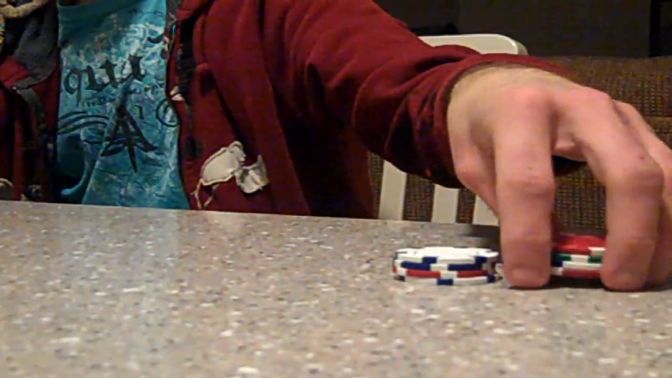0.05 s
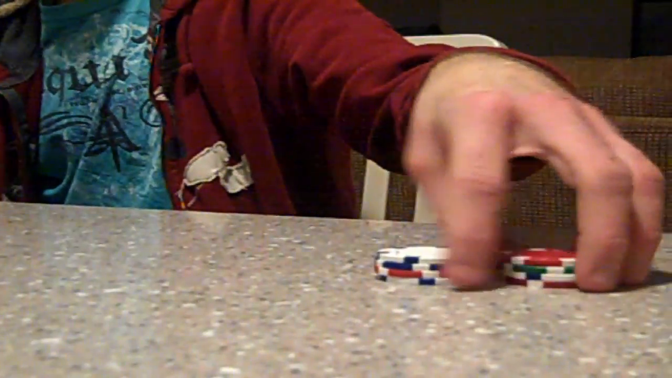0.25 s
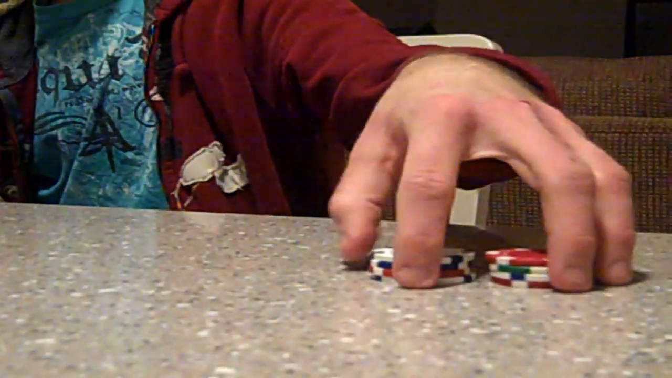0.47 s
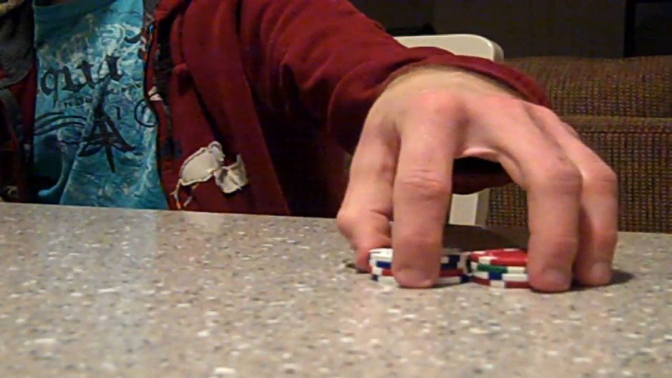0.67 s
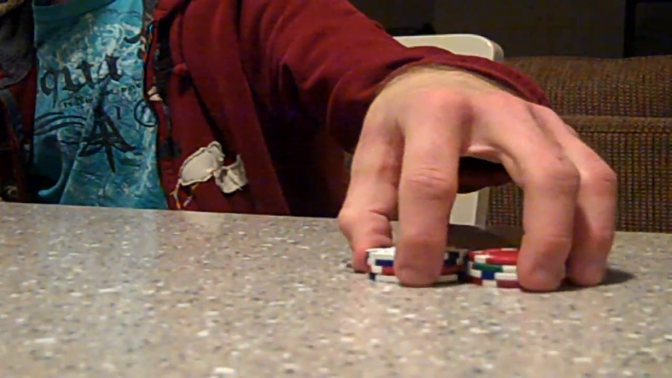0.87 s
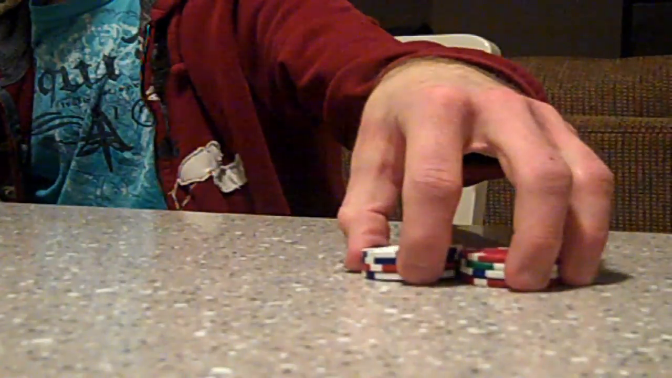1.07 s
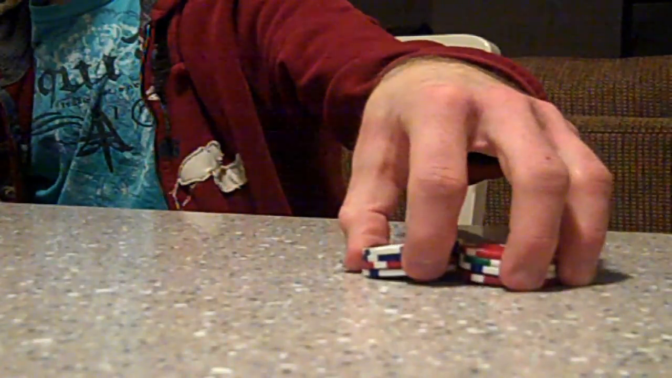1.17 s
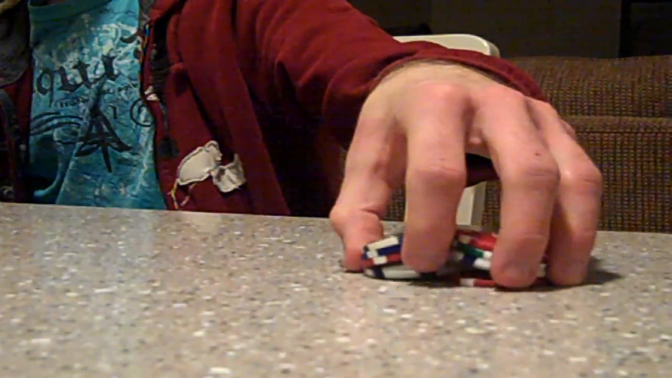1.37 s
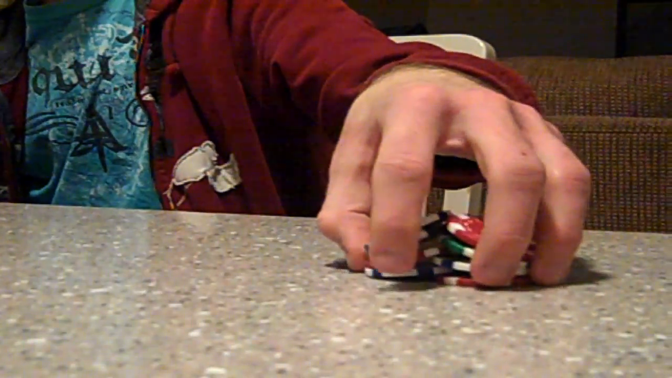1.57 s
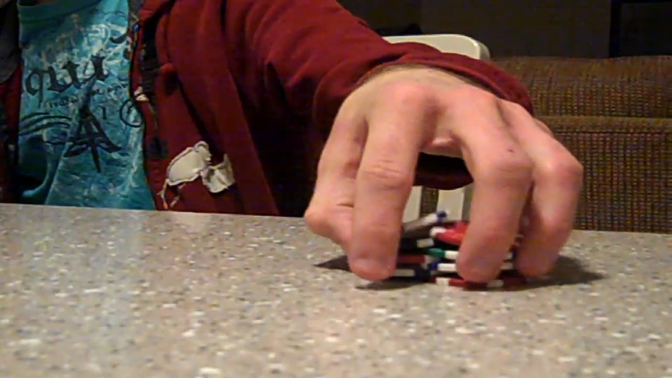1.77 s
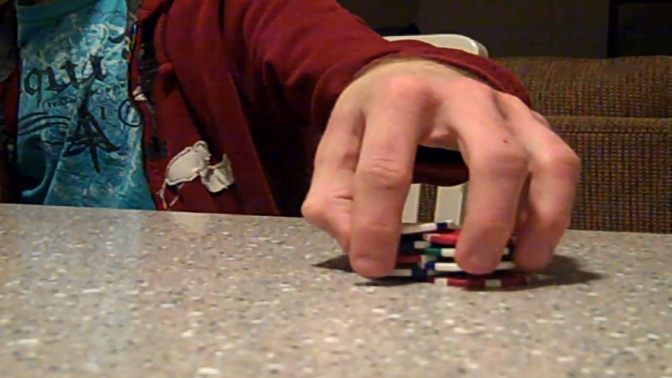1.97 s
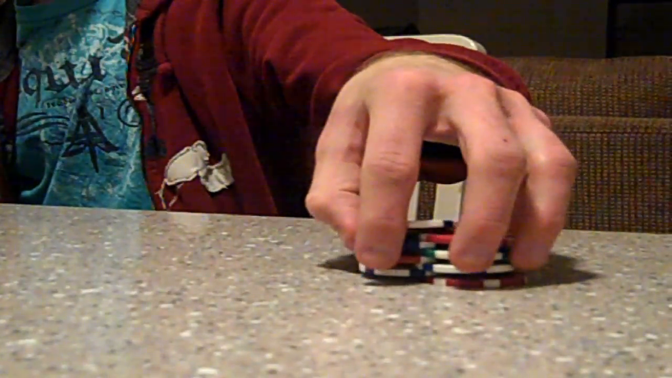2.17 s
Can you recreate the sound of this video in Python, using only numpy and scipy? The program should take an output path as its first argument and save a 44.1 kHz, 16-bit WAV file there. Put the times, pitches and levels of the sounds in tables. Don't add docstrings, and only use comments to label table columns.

```python
import sys
import numpy as np
from scipy import signal
from scipy.fft import rfft, irfft
from scipy.io import wavfile
from scipy.ndimage import uniform_filter1d

SR = 44100
rng = np.random.default_rng(int(sys.argv[2]) if len(sys.argv) > 2 else 0)


def transcribe(signal):
    frames = np.atleast_2d(signal).T
    limited = np.clip(frames, -1, 1)
    pcm = np.round(limited * 32767).astype(np.int16)
    wavfile.write(sys.argv[1], SR, pcm)


def natural_amplitude(level_db):
    exponent = np.asarray(level_db, float) / 20
    return 10 ** exponent


N = 97020

# frequency in [Hz], density in [dB per Hz].
FLOOR_SPECTRUM = [(25,4), (60,-5), (130,0), (300,-9), (700,-12), (1500,-17), (5000,-23.5), (14000,-29.5)]

# start in [s], bending level in [dB], centre of the
# bending modes in [Hz], edge level in [dB], centre of the edge modes in [Hz].
DROP_HITS = [(.1505,-60.5,2000,-31.5,9000), (.2105,-39.5,2200,-34,7240), (.2132,5,2000,10.5,11500),
             (.2148,-0.5,2900,10.5,6880), (.2165,-10,1900,11,7130), (.2195,-12.5,1900,-3,7240),
             (.2235,1,3425,-5.5,4400), (.2248,2,2400,5,6640), (.2280,-10.5,1900,-6,6200),
             (.2298,-7.5,2000,-5.5,6560), (.2325,-8,2600,5.5,6700), (.2345,-17.5,1900,-3,7700),
             (.2380,-9.5,3000,4.5,6800), (.2405,-17,1900,-2,7400), (.2430,-19.5,1900,-15,7750),
             (.2500,-21.5,1900,-24.5,7500)]
# [s, dB, Hz, dB, Hz].
MESH_HITS = [(1.4331,2,2450,-3.5,5860), (1.4372,-13.5,2490,-19.5,5000), (1.449,-47,2010,-24,7880),
             (1.461,-45,2040,-21.5,4966), (1.4690,-35,2000,-23.5,8060), (1.4963,1.5,1640,1.5,5280),
             (1.4969,1,2450,5,7960), (1.499,-11.5,2520,1.5,5600), (1.5028,-12.5,2200,-13.5,7800),
             (1.5222,-28,2010,-20,5420), (1.527,-1.5,2910,1,5640), (1.5319,-34,2005,-9,7700),
             (1.5335,-13.5,2100,-9,5640), (1.5400,-21,2200,-13,5640), (1.6383,-28.5,1950,-50,5500),
             (1.684,-33,1980,-48,5450)]
# [s, dB, Hz, dB, Hz].
SETTLE_HITS = [(1.808,-26,1990,-45,5300), (1.8160,-16,2000,-27,7200), (1.8225,-29,2370,-27,5220),
               (1.837,-27,1390,-28,5245), (1.8463,-13.5,2860,-19,5800), (1.8471,-9,1686,-22.5,4970),
               (1.8646,-13,1880,-23.5,5400), (1.877,-41,2780,-23.5,4630), (1.9158,-13,2050,-20,5730),
               (1.9230,-19.5,2390,-46,7300), (2.0816,-39.5,1890,-59.5,5500), (2.1070,-40,2000,-62,5460),
               (2.1209,-18,2670,-26,5300), (2.1280,-20,2180,-32.5,5300), (2.188,-31.5,1600,-62,5460)]
# [s, dB, Hz, dB, Hz].
EXTRA_HITS = [(.2200,-7,3640,-14,3960), (.2310,-26,3700,-7,4120), (.2420,-16,3570,-14,4495),
              (.7110,-45.5,2000,-63,5540), (.9580,-55,2400,-54,5900), (.9680,-44,2022,-52,7780),
              (.9740,-41,2390,-51,5900), (1.8115,-20.5,2040,-37,5560), (1.8135,-25,2005,-28,4820),
              (1.8185,-19.5,2020,-24,5300), (1.8275,-39,2730,-32,5350), (1.8300,-30,1640,-38,7400),
              (1.8335,-25,1500,-38,7360), (1.8420,-19,1940,-30,5180), (1.8520,-31,1987,-35,5000),
              (1.8670,-45,2400,-31,4730), (1.8720,-34,1900,-26,4750), (1.8810,-29.5,2000,-22,4600),
              (1.8870,-34,2010,-37,4700), (1.9200,-19.5,1720,-38,7260), (1.9260,-37,1900,-39,5150),
              (2.1170,-42,1640,-55,5300), (2.1235,-23.5,1860,-30.5,5640), (2.1330,-28,1900,-48.5,5400),
              (2.1380,-39,1900,-44.5,5300), (2.1440,-42,1850,-56,5000), (2.1950,-35,1380,-52,5300)]

# frequency in [Hz], level in [dB], t60 in [s].
BENDING_MODES = [(1334,-1,0.014), (1640,-4.5,.012), (1821,0,0.017), (2027,-1,.018), (2450,-1.5,0.011),
                 (2790,-2,0.015), (3040,-2,0.014), (3360,-3,.008)]
# frequency in [Hz], level in [dB], t60 in [s].
EDGE_MODES = [(4040, -1.5, 0.0043), (4400, -7.5, 0.0073), (4680, 1, 0.0074), (5300, 0.5, 0.013),
              (5826, -2.5, .011), (6020, 3, 0.0086), (6800, -1, .01), (7332, -2, 0.013), (7733, -2, 0.016),
              (8357, 1, 0.01), (9300, -3, 0.0061), (10100, -5.5, .009), (11500, -6.5, 0.0065),
              (13200, -11.5, 0.0049)]
# one level change in [dB] per edge mode, in the order of the edge modes.
GRIP_EDGE_DB = [-8.5, -1.5, 0, 1, 0.5, -5.5, -9, 1, 1, -5, -8.5, 1.5, -4.5, -5]

# frequency in [Hz], t60 in [s].
ROOM_T60 = [(100, .5), (300, 1.7), (700, 0.72), (1800, 0.78), (4800, 0.6073), (8000, 0.67), (13000, 0.35)]
# frequency in [Hz], level in [dB].
ROOM_COLOUR = [(450, -0.5), (700, 4), (1500, -1), (2800, -7), (3800, -0.5), (5000, -4), (8000, -3.5),
               (13000, 0.5)]

# start in [s], tabletop level in [dB], centre of the tabletop
# modes in [Hz], low thump level in [dB].
KNOCKS = [(.2135,-12.5,730,-26.5), (.224,-9,723,-32), (.236,-24.5,768,-42), (.711,-41.5,643,-52.5),
          (.757,-40.5,626,-65), (.773,-57,630,-68), (.850,-66,630,-49), (1.228,-45.5,800,-67),
          (1.4343,-13,640,-26.5), (1.4465,-23,644,-29.5), (1.482,-30,660,-41), (1.497,-19.5,670,-30),
          (1.509,-13.5,382,-34.5), (1.527,-15.5,638,-26.5), (1.6385,-25,697,-36), (1.683,-34,525,-43),
          (1.811,-26.5,700,-38), (1.8225,-19.5,543,-36), (1.847,-22.5,645,-29.5), (1.865,-20,793,-48),
          (1.876,-25.5,620,-35), (1.9165,-17.5,492,-26.5), (1.930,-20,376,-34.5), (1.967,-48,700,-43),
          (2.0265,-33,700,-51), (2.083,-41.5,483,-40), (2.108,-34.5,480,-44.5), (2.1208,-30,512,-30.5),
          (2.128,-36.5,400,-34), (2.137,-27.5,450,-40), (2.187,-37.5,700,-37.5)]
# frequency in [Hz], level in [dB], t60 in [s].
TABLETOP_MODES = [(357.3,-3.5,0.056), (506,1,0.037), (622,3.5,0.038), (685,1,0.027), (811,3,0.025),
                  (1052,-4,0.052)]
# frequency in [Hz], level in [dB], t60 in [s].
THUMP_MODES = [(110, -9, 0.077), (149.5, -8.5, 0.12), (223.2, -2.5, 0.11), (300, -2, 0.04656)]
# frequency in [Hz], level in [dB], t60 in [s].
PANEL_MODES = [(436,-27,.4), (624.5,-18,0.48), (710,-19.5,0.2), (785.3,-22.5,0.39), (899,-24,0.26),
               (1077,-25,0.42)]

# start in [s], length in [s], bending level in [dB], rubbing level in [dB],
# tabletop level in [dB].
SLIDES = [
    (0.937,0.049,-49,-44.5,-51),
    (1.156,0.04,-53,-56.5,-56.5),
    (1.205,0.046,-52,-58.5,-62),
    (1.355,0.092,-43.5,-56.5,-43.5),
    (1.627,0.079,-35,-43,-41),
    (1.788,0.13,-30.5,-42.5,-35.5),
    (1.9,0.088,-45,-51,-41.5),
    (2.105,0.085,-43.5,-48.5,-43),
]
# frequency in [Hz], level in [dB], t60 in [s].
RUBBING_MODES = [(4567, -5, 0.016), (5300, 0, 0.0089), (5900, 4.5, 0.0071), (7400, -3, 0.01),
                 (8000, -0.5, 0.0091), (10800, -12.5, 0.0059)]

FLOOR_DB, FLOOR_TOP_HZ = -55, 14300
RUMBLE_DB, RUMBLE_HZ, RUMBLE_LUMPS_DB = -63.5, 144, 8
FOCUS_OCT, OFF_FOCUS_DB = 0.12, -13
SCATTER_DB, DETUNE = 3, 0.025
CHIP_RISE_S, KNOCK_RISE_S = 0.00023, 0.00058
SOFT_RISE_PER_DB = 0.0045
GRIP_START_S = 1.44
ROOM_DB, ROOM_GAP_S = -31, 0.0045
EARLY_DB, EARLY_T60_S = -22, 0.17
PANEL_DAMPING_DB = -5.5
GRAINS_PER_S, GRAIN_SPREAD_DB, GRAIN_DB = 3600, 2.5, -17
MIC_LOW_HZ, MIC_TOP_HZ, CLIP_LEVEL = 92, 14020, 0.99


def at_hz(points, hz):
    p = np.array(points)
    return np.interp(np.log(np.maximum(hz, 1)), np.log(p[:, 0]), p[:, 1])


def bandpass(order, low_hz, high_hz, x):
    return signal.sosfilt(signal.butter(order, [low_hz, high_hz], "band", fs=SR, output="sos"), x)


def noise_floor():
    hz = np.arange(N // 2 + 1) * SR / N
    colour = natural_amplitude(at_hz(FLOOR_SPECTRUM, hz)) * (hz < FLOOR_TOP_HZ)
    hiss = irfft(rfft(rng.standard_normal(N)) * colour, N)
    rumble = bandpass(1, RUMBLE_HZ / 1.3, RUMBLE_HZ * 2.4, rng.standard_normal(N))
    lumps = uniform_filter1d(uniform_filter1d(rng.standard_normal(N), size=2000), size=2000)
    rumble = rumble * natural_amplitude(RUMBLE_LUMPS_DB * lumps / lumps.std())
    return natural_amplitude(FLOOR_DB) * hiss / hiss.std() + natural_amplitude(RUMBLE_DB) * rumble / rumble.std()


def strike(modes, starts, db, centre_hz=None, rise=CHIP_RISE_S, grip_db=None):
    hz, level_db, t60 = np.transpose(modes)
    t = np.arange(int(t60.max() * SR))[:, None] / SR
    out = np.zeros(N + SR)
    draws = rng.standard_normal((len(starts), 3, len(hz)))
    for k, (spread, detune, sign) in enumerate(draws):
        mode_db = db[k] + level_db + SCATTER_DB * spread
        if grip_db is not None:
            mode_db += grip_db[k]
        if centre_hz is not None:
            octaves_off = np.log2(hz / centre_hz[k])
            mode_db += OFF_FOCUS_DB * (1 - np.exp(-(octaves_off / FOCUS_OCT) ** 2 / 2))
        blow_rise = rise * (1 + SOFT_RISE_PER_DB * max(-db[k], 0))
        attack = 1 - np.exp(-t / blow_rise)
        envelope = natural_amplitude(mode_db - 60 * t / t60) * attack * np.sign(sign)
        tones = np.sin(2 * np.pi * hz * (1 + DETUNE * detune) * t)
        start = int(starts[k] * SR)
        out[start:start + len(t)] += (envelope * tones).sum(axis=1) / 1.222
    return out[:N]


def chip_contacts(rows):
    starts, bend_db, bend_hz, edge_db, edge_hz = np.transpose(rows)
    grip_db = np.outer(starts > GRIP_START_S, GRIP_EDGE_DB)
    bending = strike(BENDING_MODES, starts, bend_db, bend_hz)
    return bending + strike(EDGE_MODES, starts, edge_db, edge_hz, grip_db=grip_db)


def room_answer(x):
    t = np.arange(SR) / SR
    white = rng.standard_normal((2, SR))
    edges = 70 * 2 ** np.arange(0, 8, .5)
    tail = 0
    for k, (low, high) in enumerate(zip(edges, edges[1:])):
        hz = np.sqrt(low * high)
        band = bandpass(2, low, high, white[k % 2])
        late = natural_amplitude(ROOM_DB - 60 * t / at_hz(ROOM_T60, hz))
        early = natural_amplitude(EARLY_DB - 60 * t / EARLY_T60_S)
        tail = tail + band * natural_amplitude(at_hz(ROOM_COLOUR, hz)) * (late + early)
    tail = tail * np.clip(t / ROOM_GAP_S, 0, 1) / 10
    size = 1 << 18
    return irfft(rfft(x, size) * rfft(tail, size), size)[:N]


def ring(clicks, modes):
    out = 0
    for k, (hz, level_db, t60) in enumerate(modes):
        radius = natural_amplitude(-60 / (max(t60, .002) * SR))
        w = 2 * np.pi * hz / SR
        push = [0, natural_amplitude(level_db) * np.sin(w)]
        decay = [1, -2 * radius * np.cos(w), radius * radius]
        out = out + (-1) ** k * signal.lfilter(push, decay, clicks + 1e-18)
    return out


def table_knocks():
    starts, top_db, top_hz, low_db = np.transpose(KNOCKS)
    blows = np.zeros(N)
    blows[(starts * SR).astype(int)] = natural_amplitude(top_db + PANEL_DAMPING_DB * (starts > 1))
    tabletop = strike(TABLETOP_MODES, starts, top_db, top_hz, rise=KNOCK_RISE_S)
    thump = strike(THUMP_MODES, starts, low_db, rise=KNOCK_RISE_S)
    return tabletop + thump + ring(blows, PANEL_MODES)


def chip_slides():
    grains = (rng.random(N) < GRAINS_PER_S / SR) * rng.choice([-1, 1], N)
    grains = grains * natural_amplitude(GRAIN_SPREAD_DB * np.minimum(rng.exponential(1, N), 4) + GRAIN_DB)
    t = np.arange(N) / SR
    drive = np.zeros((3, N))
    for start, length, *db in SLIDES:
        stroke = np.sin(np.pi * np.clip((t - start) / length, 0, 1)) ** 2
        drive += natural_amplitude(np.array(db))[:, None] * stroke * grains
    bending = ring(drive[0], BENDING_MODES[:5])
    return bending + ring(drive[1], RUBBING_MODES) + ring(drive[2], TABLETOP_MODES)


def scene():
    chips = chip_contacts(DROP_HITS + MESH_HITS + SETTLE_HITS) + chip_contacts(EXTRA_HITS)
    close = chips + table_knocks() + chip_slides()
    return (close + room_answer(close) + noise_floor())[None]


def low_pass(x):
    return signal.sosfilt(signal.butter(12, 20000, fs=SR, output="sos"), x)


def record(dry):
    mic = bandpass(2, MIC_LOW_HZ, MIC_TOP_HZ, dry)
    return low_pass(np.clip(mic, -CLIP_LEVEL, CLIP_LEVEL))


dry = scene()
out = record(dry)
transcribe(out)
```